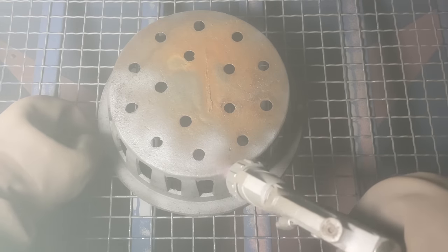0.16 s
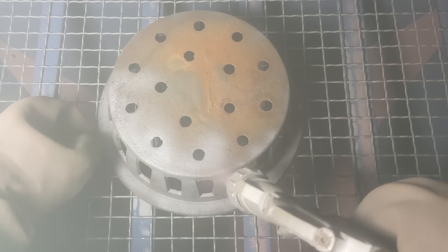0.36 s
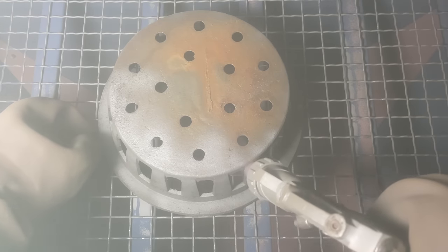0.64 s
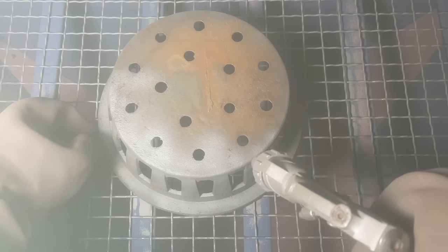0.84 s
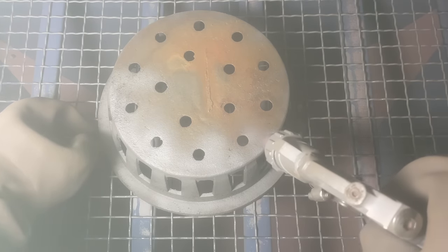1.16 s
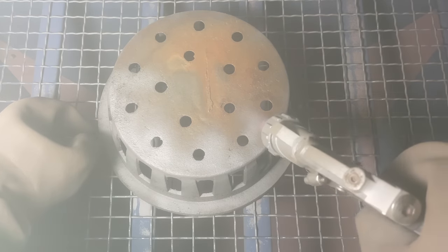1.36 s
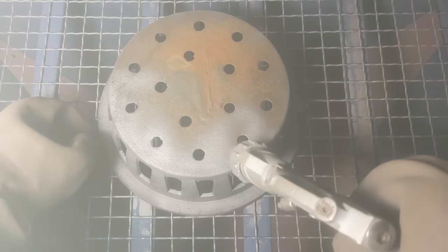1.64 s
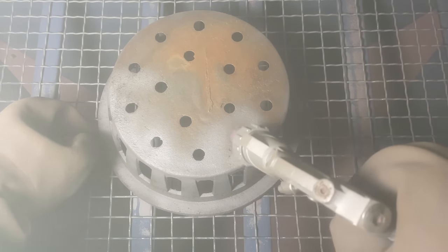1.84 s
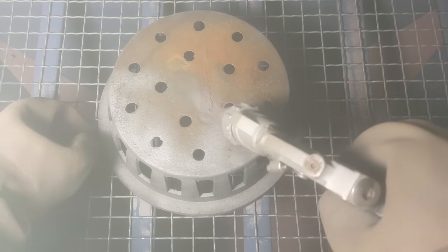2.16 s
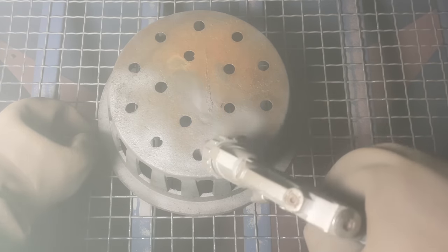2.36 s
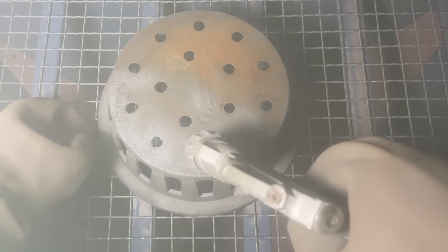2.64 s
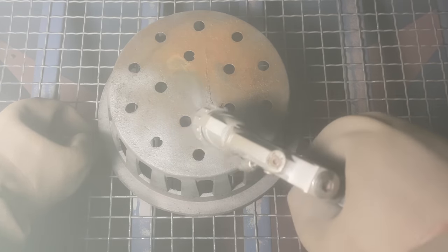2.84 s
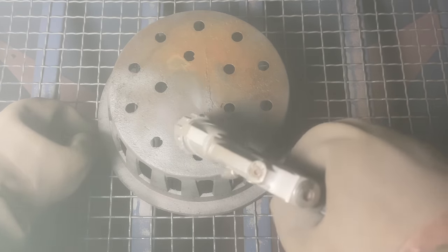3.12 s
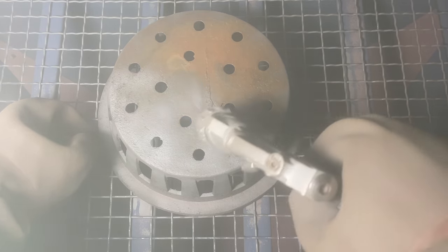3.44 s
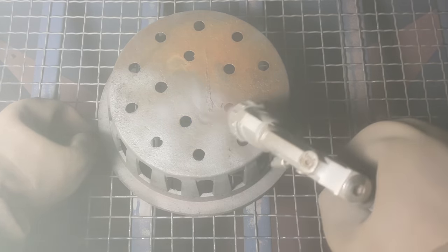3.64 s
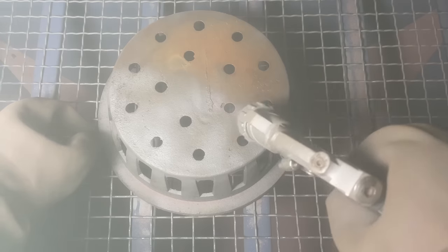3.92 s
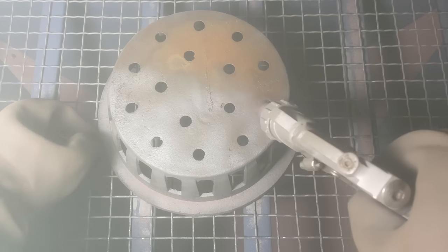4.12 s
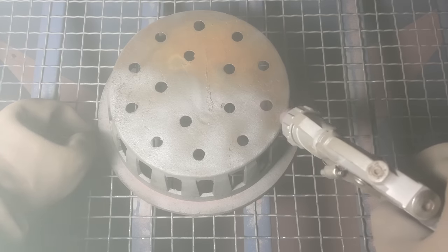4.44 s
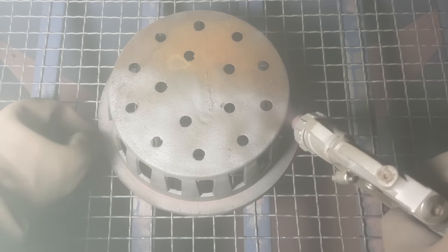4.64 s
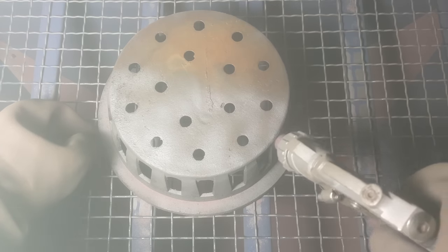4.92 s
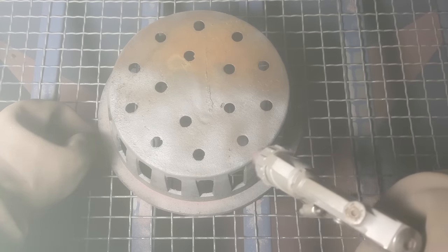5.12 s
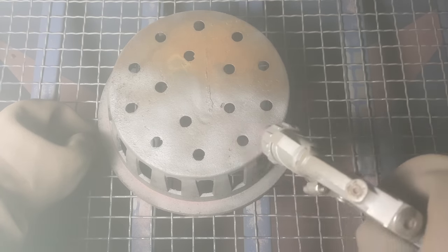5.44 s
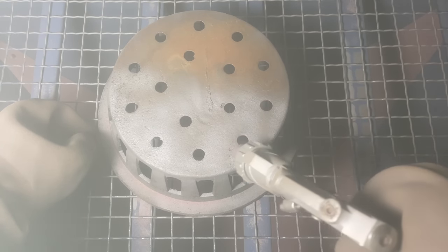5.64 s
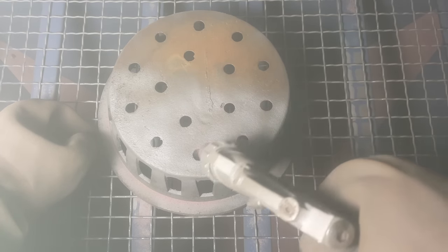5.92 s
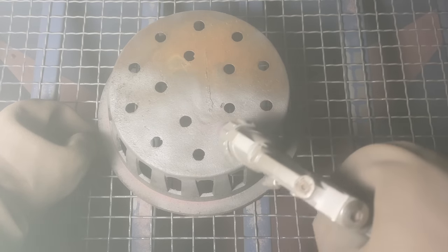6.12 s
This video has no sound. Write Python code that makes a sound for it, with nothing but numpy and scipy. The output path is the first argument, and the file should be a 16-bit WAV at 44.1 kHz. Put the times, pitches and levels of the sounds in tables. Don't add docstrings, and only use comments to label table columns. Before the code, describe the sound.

Very close inside a steel cabinet, a jet of air and grit roars without pause against an iron part. The roar is boxy and coloured by metal resonances, with a bright nozzle hiss and dense grit rattle on top. It swells briefly as the jet crosses holes, most strongly in the middle. A dust extractor hums underneath and gusts bump the stereo microphone.

```python
import sys
import numpy as np
from scipy import signal
from scipy.fft import rfft, irfft, next_fast_len
from scipy.io import wavfile
from scipy.ndimage import uniform_filter1d, map_coordinates

SR = 44100
rng = np.random.default_rng(int(sys.argv[2]) if len(sys.argv) > 2 else 0)


def invert_db(x):
    u = np.asarray(x, float) / 20
    return 10 ** u


def generate_wav(signal):
    frames = np.transpose(np.atleast_2d(signal))
    scaled = np.clip(frames, -1, 1) * 32767
    pcm = np.round(scaled).astype(np.int16)
    wavfile.write(sys.argv[1], SR, pcm)


N = 276595


def unit(x):
    return x / np.sqrt(np.mean(x ** 2) + 1e-20)


def along(points, hz):
    point_hz, values = np.transpose(points)
    return np.interp(np.log(hz + 1), np.log(point_hz + 1), values)


def curves(rows):
    times, *columns = np.transpose(rows)
    return [np.interp(np.arange(N) / SR, times, column) for column in columns]


def wobble(rate):
    knots = rng.standard_normal(int(N * rate / SR) + 4)
    return map_coordinates(knots, [np.arange(N) * rate / SR])


def swells(starts, lengths, heights, attack_s, release_s):
    t = np.arange(N) / SR

    def edge(u):
        return 1 / (1 + np.exp(-np.clip(4 * u, -30, 30)))

    return sum(height * edge((t - start) / attack_s) * edge((start + length - t) / release_s)
               for start, length, height in zip(starts, lengths, heights))


def filtered(x, response):
    size = next_fast_len(N + 8192)
    return irfft(rfft(x, size) * response(np.fft.rfftfreq(size, 1 / SR)), size)[..., :N]


def shaped(spectrum):
    return lambda hz: invert_db(along(spectrum, hz))


def resonant(modes, skirt):
    def gain(hz):
        power = 0
        for centre, width, db in modes:
            detuning = (hz * hz - centre * centre) / (hz * width + 1)
            power = power + invert_db(2 * db) / (1 + detuning ** 2) ** skirt
        return np.sqrt(power)
    return gain


# (frequency [Hz], likeness [0-1])
PORT_LIKENESS = [(60, .97), (330, .92), (500, .5), (700, .1), (900, .4), (1030, .65), (1170, .4),
                 (1350, .8), (2200, .92), (3300, .78), (4500, .55), (6000, .88), (6900, .72), (7700, .955)]
# (frequency [Hz], level [dB])
PORT_LEAN = [(60, 0), (210, .5), (330, 4), (770, 4.5), (1040, .5), (1200, 5), (1400, .5), (1600, .5),
             (1800, 5), (2400, 9), (3300, 7), (4200, 5), (6400, 2), (7500, 0)]
# (frequency [Hz], lead [rad])
PORT_LEAD = [(790, 0), (900, -2.4), (1000, -.2), (3500, .5), (4050, 0), (4850, 1), (5700, 0), (7000, -1.4),
             (7650, -3.05), (8400, -3.3), (9600, -4.5), (10400, -6.1), (12550, -6.4), (14050, -9.4)]


def ports(pair, response):
    size = next_fast_len(N + 8192)
    hz = np.fft.rfftfreq(size, 1 / SR)
    turn = np.arccos(np.clip(along(PORT_LIKENESS, hz), 0, 1)) / 2
    common, apart = rfft(pair, size) * response(hz) * [np.cos(turn), np.sin(turn)]
    half_lead = np.exp(.5j * along(PORT_LEAD, hz))
    left = (common + apart) * half_lead
    right = (common - apart) * invert_db(-along(PORT_LEAN, hz)) / half_lead
    both = irfft([left, right], size)[:, :N]
    return both / np.std(both.mean(0))


def turbulence(response, patchy_db, grain_db, streak_db):
    bursts = rng.standard_normal((2, N)) * invert_db(grain_db * wobble(400))
    z = signal.stft(bursts, nperseg=1024)[2]
    patches, streaks = rng.standard_normal((2,) + z.shape[1:])
    patches = uniform_filter1d(uniform_filter1d(patches, size=12, axis=0), size=5, axis=1)
    streaks = uniform_filter1d(streaks, size=30, axis=1)
    gain_db = patchy_db * unit(patches) + streak_db * unit(streaks)
    pair = signal.istft(z * invert_db(gain_db), nperseg=1024)[1][:, :N]
    return ports(pair, response)


# (time [s], length [s], surge [dB], lull after it [dB], shrillness [dB])
HOLE_EDGES = [(1.002, 0.12, 3, 0, 0), (2.25, 0.12, 1.5, -1.5, -1.5), (2.80, 0.11, 1.5, 0.5, -0.5),
              (3.5, 0.077, 7.5, 2, 1), (3.76, .29, 5, 1.5, 0), (4.22, 0.077, 1, -0.5, -0.5),
              (4.337, 0.11, 5, 0.5, 1), (4.455, 0.083, 2, 2.5, 2.5), (4.88, 0.07, 1.5, 1, 0),
              (5.054, 0.11, 2, 0.5, -0.5), (5.4, 0.1, 2.5, -1.5, -3), (6.058, .07, 2.5, -0.5, -1)]
HOLE_ATTACK_S, HOLE_RELEASE_S, LULL_S = 0.059, 0.037, 0.15
# (time [s], length [s], gain [dB], starving before it [dB])
GRIT_SLUGS = [
    (0.098, 0.065, 2, -0.5),
    (0.665, 0.35, 4.5, 1),
    (1.67, .27, 4.5, 2),
    (2.704, 0.29, 4.5, 5.5),
    (3.38, 0.22, 1, 1.5),
    (3.704, 0.22, 2.5, 2.5),
    (4.39, 0.16, 3.5, 0.5),
    (4.843, 0.19, 3, -1.5),
    (5.613, .19, 2, 4.5),
]
SLUG_ATTACK_S, SLUG_RELEASE_S, STARVE_S = .07, 0.054, 0.14


def motion():
    start, length, surge, lull, _ = np.transpose(HOLE_EDGES)
    surge_db = swells(start, length, surge, HOLE_ATTACK_S, HOLE_RELEASE_S)
    surge_db -= swells(start + length, 0 * length + LULL_S, lull, HOLE_RELEASE_S, HOLE_ATTACK_S)
    start, length, gain, starve = np.transpose(GRIT_SLUGS)
    slug_db = swells(start, length, gain, SLUG_ATTACK_S, SLUG_RELEASE_S)
    slug_db -= swells(start - STARVE_S, 0 * length + STARVE_S, starve, STARVE_S, SLUG_ATTACK_S)
    standoff_db = curves(GUN_SWEEP)[2]
    return standoff_db, surge_db, slug_db


def shrill():
    start, length, *_, shrill_db = np.transpose(HOLE_EDGES)
    return swells(start, length, shrill_db, HOLE_ATTACK_S, HOLE_ATTACK_S)


LAYER_LEVELS = { "ring": (-37.5, 0.8, 0.42, 0.06), "rattle": (-39.5, 0.1, 0.42, 1.06),
                "hiss": (-35.5, 0.36, -0.02, .5), "fizz": (-44, 0.74, .03, .55),
                "draught": (-39, 0.43, -0.02, 0.39)}


def level(layer, drive):
    base_db, *shares = LAYER_LEVELS[layer]
    return base_db + np.dot(shares, drive)


# (frequency [Hz], level [dB rms])
BLADE_TONE = (310.7, -45.5)
# (frequency [Hz], width [Hz], level [dB])
DUCT_MODES = [(222, 43, -10), (250.3, 34, -3), (341, 15.6, -0.5), (423.4, 11.2, 3.5), (496, 49, -6.5),
              (550, 21, -5.5), (640, 71, -9), (726, 22, -4.5), (822, 37, -4)]
CLOG_DB_PER_S = .35


def extractor(drive):
    tone_hz, tone_db = BLADE_TONE
    tone_level = np.sqrt(2) * invert_db(tone_db + 0.32 * wobble(4.0))
    tone = tone_level * np.sin(2 * np.pi * np.cumsum(tone_hz + 0.72 * wobble(5)) / SR)

    def duct(hz):
        cut_on = np.sqrt(1 + (85 / (hz + 1)) ** 4)
        return resonant(DUCT_MODES, skirt=.9)(hz) / cut_on

    draught_db = level("draught", drive) - CLOG_DB_PER_S * np.arange(N) / SR
    draught = invert_db(draught_db) * turbulence(duct, patchy_db=1.08, grain_db=0.05, streak_db=0.07)
    return draught + tone * invert_db([[1.8], [-2.2]])


# (time [s], length [s], level [dB])
AIR_GUSTS = [(0.055, 0.1, -42.5), (0.30, 0.12, -45), (0.66, 0.16, -61), (0.8, 0.14, -57), (1.00, 0.3, -51),
             (1.554, 0.14, -47), (1.71, 0.075, -50), (1.80, 0.11, -55), (2.445, 0.21, -49),
             (2.677, 0.22, -49), (2.897, .22, -48), (3.717, .06, -55), (3.81, 0.11, -48), (4.42, 0.06, -56),
             (4.88, 0.089, -61), (5.19, .14, -56), (5.36, 0.2, -58), (5.62, 0.14, -52.5)]
GUST_ATTACK_S, GUST_RELEASE_S, CALM_DB = 0.047, 0.091, -66.5
# (frequency [Hz], level [dB per Hz])
HOUSING_THUMP = [(15, -24), (30, -15), (60, -4), (120, -3.5), (170, -12.5), (260, -34.5)]


def buffet():
    start, length, gust_db = np.transpose(AIR_GUSTS)
    level_db = CALM_DB + swells(start, length, gust_db - CALM_DB, GUST_ATTACK_S, GUST_RELEASE_S)
    thump = turbulence(shaped(HOUSING_THUMP), patchy_db=1.7, grain_db=1.0, streak_db=0.5)
    return invert_db(level_db + 5.0) * unit(invert_db(1.5 * wobble(17)) * thump)


# (frequency [Hz], level [dB per Hz])
GRIT_RATTLE = [(3300, -38), (3650, 0), (4000, -2.5), (4600, -3), (5200, -5.5), (5350, -1), (5700, -44)]
NOZZLE_HISS = [(5200, -40), (5450, -5), (5700, -3), (6200, 0), (6800, -6), (7100, -3), (7550, -7),
               (7750, -5), (8200, -8), (8560, -9), (8700, -40)]
NOZZLE_FIZZ = [(8380, -40), (8620, 2), (8800, -1), (9300, 0), (9800, -9), (10000, -7), (10250, -13),
               (11000, -10), (11900, -16), (12300, -12), (13100, -12), (14500, -18), (15600, -9),
               (15750, -9)]


def grit(flutter, drive):
    rattle = turbulence(shaped(GRIT_RATTLE), patchy_db=-0.04, grain_db=0.8, streak_db=3.5)
    hiss = turbulence(shaped(NOZZLE_HISS), patchy_db=0.76, grain_db=0.2, streak_db=3.5)
    fizz = turbulence(shaped(NOZZLE_FIZZ), patchy_db=.9, grain_db=.2, streak_db=4)
    mix = invert_db(level("rattle", drive)) * rattle
    mix = mix + invert_db(level("hiss", drive)) * hiss
    mix = mix + invert_db(level("fizz", drive)) * fizz
    return invert_db(0.6 * flutter) * mix


# (time [s], roar level [dB], aim [-], stand-off gain [dB])
GUN_SWEEP = [(0, -23.5, 1.5, -1.5), (.2, -25.5, 1, -1.5), (.4, -27, 2.5, -3.5), (.62, -26.5, 0, -0.5),
             (.9, -27, 0, -2), (1.35, -26, -2, 1), (1.6, -28, -1, -1.5), (2.15, -29, 0, 1.5),
             (2.27, -27, 1, 0.5), (2.75, -27, 1, 2), (3.3, -27, 2, -1), (3.75, -28, -3, 1.5),
             (4.1, -28, -2.5, -.5), (4.6, -27.5, 1, -4), (5.0, -27, -0.5, -2.5), (5.6, -29, -1.5, 0),
             (5.95, -26.5, 2.5, -0.5), (6.27, -29, -2, -0.5)]
# (share [dB], lean [dB per aim], gain [dB per surge dB])
CABINET_LOBES = [(-3, -0.6, 0.96), (-4, 1, 0.85), (-8, -0.28, 0.97)]
# (frequency [Hz], width [Hz], level [dB])
CABINET_LOW = [(1756, 30, -5), (1845, 46, -6.5), (1913, 115, -9), (2065, 96, -1.5), (2138, 39, -2),
               (2242, 74, 1)]
CABINET_MID = [(2408, 117, 0.5), (2484, 60, 0.5), (2630, 65, -0.5), (2720, 68, -2.5)]
CABINET_HIGH = [(2854, 61, -0.5), (3038, 210, -0.5), (3219, 20, 1.5), (3300, 23, 4.5), (3425, 60, -4),
                (3493, 91, -4.5), (3576, 31, 0)]
PART_MODES = [(967, 29, -3), (1036, 46, 0.5), (1133, 35, 0), (1217, 23, -2), (1303, 48, 0), (1413, 18, 1.5),
              (1478, 29, -6.5), (1577, 31, -1), (1666, 30, -8)]


def jet(flutter, drive):
    roar_db, aim, _ = curves(GUN_SWEEP)
    surge_db = drive[1]
    lobe_modes = (CABINET_LOW, CABINET_MID, CABINET_HIGH)
    roar = 0
    for (share_db, lean, gain), modes, extra_db in zip(CABINET_LOBES, lobe_modes, (0, 0, shrill())):
        lobe_db = share_db + lean * aim + gain * surge_db + extra_db + 0.39 * wobble(21.97)
        noise = turbulence(resonant(modes, skirt=1.35), patchy_db=0.54, grain_db=0.07, streak_db=1.5)
        roar = roar + invert_db(lobe_db) * noise
    ring = turbulence(resonant(PART_MODES, skirt=1.03), patchy_db=0.94, grain_db=0.0, streak_db=2.1)
    ring = invert_db(level("ring", drive) + 0.48 * wobble(20)) * ring
    return invert_db(roar_db + 0.26 * flutter + 0.61 * wobble(130)) * roar + ring


def scene():
    flutter = 0.55 * wobble(24) + 0.93 * wobble(45)
    drive = motion()
    return extractor(drive) + buffet() + grit(flutter, drive) + jet(flutter, drive)


def low_pass(x):
    return signal.sosfilt(signal.butter(12, 15730, fs=SR, output="sos"), x)


def record(dry):
    mix = filtered(dry, lambda hz: hz < 15750)
    return low_pass(mix)


dry = scene()
out = record(dry)
generate_wav(out)
```